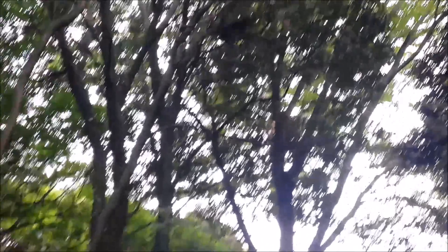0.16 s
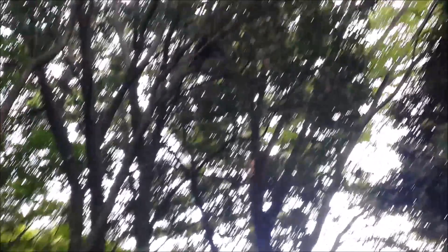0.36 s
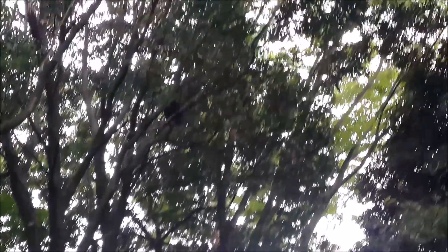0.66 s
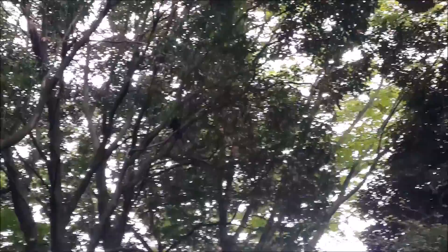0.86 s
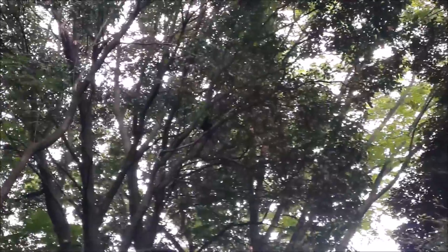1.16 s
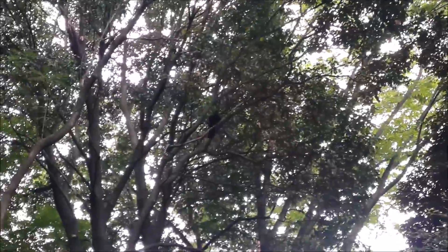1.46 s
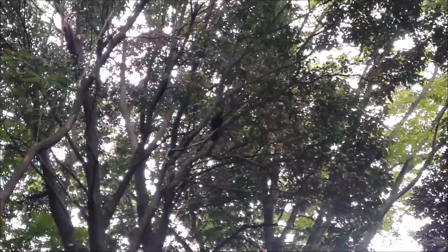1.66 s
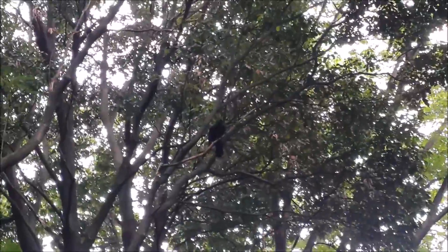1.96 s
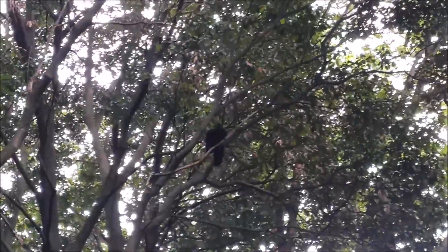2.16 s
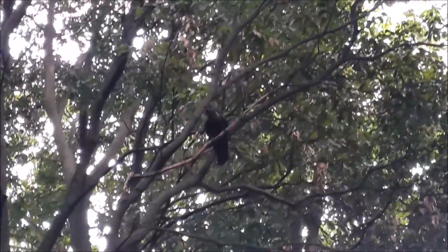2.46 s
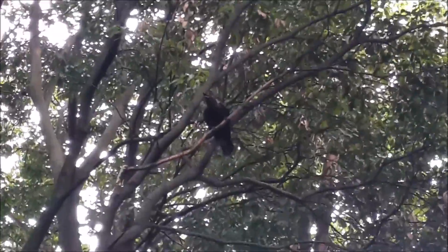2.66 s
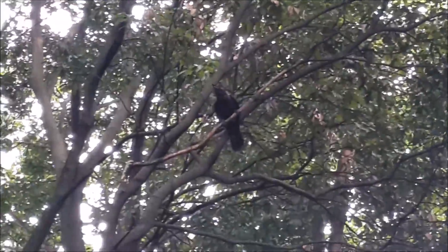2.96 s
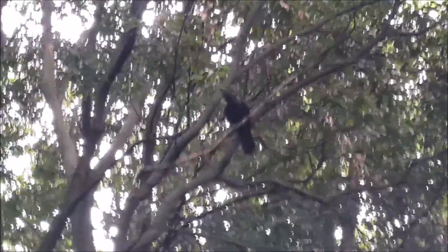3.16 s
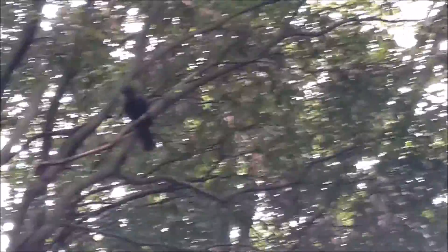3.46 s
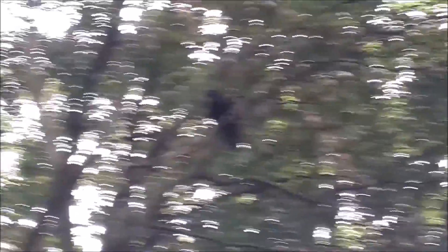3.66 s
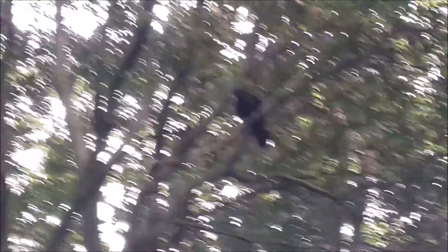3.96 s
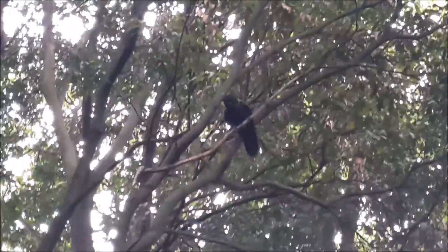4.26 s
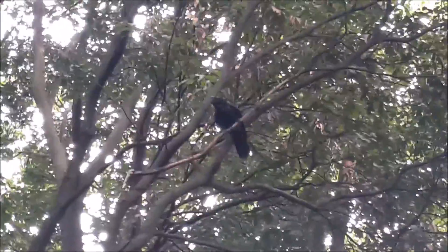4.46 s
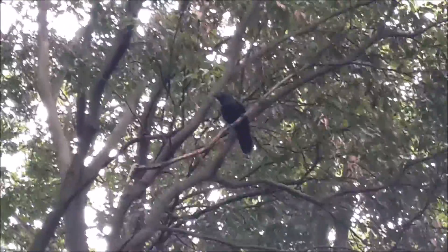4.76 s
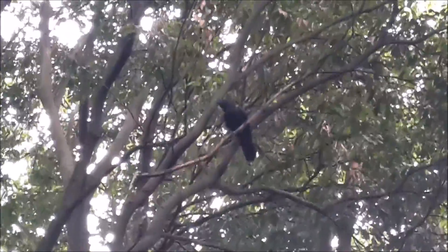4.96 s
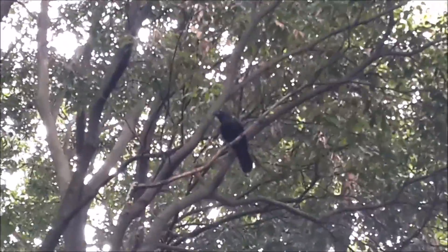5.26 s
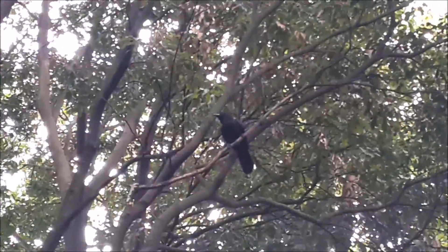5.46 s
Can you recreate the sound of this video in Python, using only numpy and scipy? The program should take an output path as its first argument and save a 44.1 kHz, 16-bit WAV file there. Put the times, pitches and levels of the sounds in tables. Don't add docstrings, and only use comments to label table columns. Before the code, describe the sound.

Quiet town rumble and airy leaf hiss quickly fade in within the first second, with a faint hoarse caw at 0-0.4 s. A crow some ten metres off then caws loudly at about 0.55, 1.45 and 2.1 s, each about a third of a second, nasal and raspy, rising quickly then sagging in pitch, with diffuse echoes from the trunks. A new caw starting at 2.7 s is cut off by a dropout; sound returns at 2.82 s with a short low thump and a fading echo. Around 3.25-3.3 s a finger slip makes a sharp, loud cluster of clicks on the left only. Caws resume at 3.5 s and, longer, 4.2-4.6 s. Thin, slightly falling whistles near 8 kHz come from the left at 0.4, 2.4, 2.75, 4.1 and 5 s. A distant lorry swells near 2.2 s, an engine drone near 4.2 s, and leaves rustle faintly around 4-4.7 s. A barely audible far crow begins at 5.5 s.

```python
import sys
import numpy as np
from scipy import signal
from scipy.fft import rfft, irfft
from scipy.io import wavfile
from scipy.ndimage import uniform_filter1d

SR = 44100
rng = np.random.default_rng(int(sys.argv[2]) if len(sys.argv) > 2 else 0)


def how_loud(loudness_db):
    steps = np.asarray(loudness_db, float) / 20
    return 10 ** steps


def unload_audio(sound):
    columns = np.transpose(np.atleast_2d(sound))
    steps = np.round(np.clip(columns, -1, 1) * 32767)
    wavfile.write(sys.argv[1], SR, steps.astype(np.int16))


N = 247356

# start_s, level_db
BACKGROUND_LEVEL = [(0, -38), (.45, -47), (.95, -51.5), (1.35, -56), (1.9, -51.5), (2.6, -52), (2.82, -57),
                    (3.2, -53.5), (4.1, -53.5), (4.7, -52.5), (5.1, -56), (5.61, -56)]
# pitch_hz, density_db (per Hz)
AIR_SPECTRUM = [(25, -35), (64, -6), (285, -7), (1100, -13), (1900, -17.5), (7710, -20), (8360, -30),
                (16000, -27)]
# pitch_hz, correlation (0-1)
PORT_LIKENESS = [(60, 0.8), (130, 0.95), (290, 0.76), (640, 0.52), (1410, 0), (3100, -0.13), (6820, 0.1),
                 (15000, 0)]
# centre_s, spread_s, level_db
RUSTLES = [
    (1.002, 0.15, -65.5),
    (4.0, 0.13, -59),
    (4.739, 0.068, -57.5),
]
# start_s, length_s, pitch_hz (at the start), fall_hz, level_db
WHISTLES = [
    (.39, .18, 8500, 190, -65.5),
    (2.43, .215, 8790, 235, -63),
    (2.75, 1.15, 8345, 150, -65.5),
    (4.085, .585, 8170, 180, -65),
    (5.0, .61, 8380, 217, -67.5),
]
# start_s, ring_db (peak), ring_hz, knock_db, crack_db
FINGER_SLIPS = [(3.2465, -34, 1480, -40, -60), (3.2595, -30, 6500, -36, -37), (3.262, -36, 2600, -36, -40),
                (3.266, -28, 7700, -31, -28), (3.2692, -27, 6500, -46, -30), (3.2747, -29, 5456, -50, -60),
                (3.28, -11, 4940, -14, -45), (3.283, -30, 5500, -44, -40), (3.285, -6, 5900, -54, -14),
                (3.2945, -9, 5600, -54, -19), (3.3059, -9.5, 5900, -53, -28)]
# lost_s, return_s
DROPOUT = (2.7385, 2.8174)
# centre_hz, width_hz, level_db
WINDPIPE = [
    (1200, 330, -4.5),
    (1730, 315, -19.5),
    (2233, 420, -24.5),
]
# centre_hz, width_hz, partials_db, turbulence_db
UPPER_RESONANCES = [(4250, 290, -12.5, -4.5), (4697, 1060, -8.5, -1.5), (6140, 5600, -33, -0.5),
                    (7570, 850, -19, -7.5), (10330, 1900, -15, -8.5)]
# start_s, pitch_hz, level_db, beak_hz (resonance)
FIRST_CAWS = [
    [(.545, 262.1, -43.5, 1130), (.589, 304.8, -31.5, 1330), (.649, 313.4, -23, 1310),
     (.707, 296.8, -24, 1350), (.791, 248.8, -28, 1210), (.819, 216.5, -33, 1200), (.845, 189.4, -36, 1260),
     (.87, 176, -48, 1290)],
    [(1.43, 220.5, -52, 1350), (1.466, 243.5, -31, 1345), (1.524, 302, -24, 1566),
     (1.57, 297.2, -22.5, 1480), (1.62, 285.3, -22.5, 1390), (1.64, 280, -26, 1495),
     (1.712, 251.3, -26, 1310), (1.758, 215.8, -31.5, 1300), (1.8, 185.5, -28, 1250)],
    [(2.07, 222, -75, 1200), (2.094, 231.9, -30.5, 1260), (2.13, 289.5, -25.5, 1485),
     (2.18, 308.7, -22.5, 1266), (2.28, 289.3, -23.5, 1440), (2.324, 265, -26, 1360),
     (2.39, 208.8, -32, 1250), (2.43, 201.8, -67, 1270)],
]
# start_s, pitch_hz, level_db, beak_hz
LATER_CAWS = [
    [(3.49, 217.2, -49, 1140), (3.522, 236.2, -32, 1296), (3.59, 293.7, -23, 1480),
     (3.642, 295.6, -23.5, 1440), (3.702, 279.6, -24, 1310), (3.788, 253.6, -27, 1310),
     (3.832, 235.6, -29.5, 1463), (3.868, 199.8, -30, 1257), (3.91, 187.2, -48, 1190)],
    [(4.18, 183.8, -62, 1275), (4.2, 206.6, -42.5, 1300), (4.234, 261.3, -25.5, 1353),
     (4.258, 285, -26, 1420), (4.296, 299.9, -23, 1460), (4.404, 284.7, -22.5, 1405),
     (4.458, 261, -24.5, 1314), (4.556, 204, -34.5, 1278), (4.6, 185, -34.5, 1260)],
]
# start_s, pitch_hz, level_db, beak_hz
HOARSE_CAW = [(.02, 279, -61, 1130), (0.039, 288, -48.5, 1100), (.08, 286.3, -42, 1110),
              (0.207, 305.3, -39, 1280), (.274, 254.2, -42.5, 1222), (.31, 253, -41.5, 1200),
              (.34, 238, -42.5, 1170), (0.368, 237, -60, 1200)]
# start_s, pitch_hz, level_db, beak_hz
LOST_CAW = [
    (2.71, 218, -39.5, 1160),
    (2.729, 227.4, -41, 1120),
    (2.74, 250, -33.5, 1200),
    (2.78, 254, -47, 1200),
]
# start_s, pitch_hz, level_db, beak_hz
FAR_CAW = [
    (5.461, 299, -74, 1250),
    (5.51, 312, -62, 1240),
    (5.57, 280, -60, 1200),
]
# opening_db (beak at full cry), facing_db (head turned this way),
# pan_db (left minus right), roughness (0-1), rasp_hz (lowest upper resonance)
MANNER = [
    (5, 0.5, 4.5, 0.09, 3140),
    (14, 0.5, 0.9, 0.1, 3270),
    (6.5, 3, -0.5, 0.08, 3410),
    (7.5, 0.2, -0.5, .06, 3460),
    (-1, -0.2, 0, .06, 3430),
    (4.5, 1.5, 3, 0.34, 2950),
    (-15, 9.5, -0.5, 0.14, 3230),
    (-6, -10, -5, 0.26, 3400),
]


def curve(table, s):
    table = np.array(table, float)
    return [np.interp(s, table[:, 0], column) for column in table[:, 1:].T]


def unit(x):
    return x / np.sqrt(np.mean(x ** 2))


def walk(rate, count):
    hold = int(SR / rate)
    steps = np.repeat(rng.standard_normal(count // hold + 1), hold)
    return unit(uniform_filter1d(uniform_filter1d(steps, hold), hold)[:count])


def resonance(hz, centre_hz, width_hz):
    return 1 / (1 + 1j * (hz - centre_hz ** 2 / hz) / width_hz)


def shape(x, response):
    hz = np.arange(1, x.shape[-1] // 2 + 2) * SR / x.shape[-1]
    return irfft(rfft(x) * response(hz), x.shape[-1])


def band(x, centre_hz, width_hz):
    return shape(x, lambda hz: resonance(hz, centre_hz, width_hz) ** 2)


def gate(count, rise_s, fall_s):
    s = np.arange(count) / SR
    return np.clip(s / rise_s, 0, 1) * np.clip((s[-1] - s) / fall_s, 0, 1)


def add(out, x, at_s):
    i = int(at_s * SR)
    out[..., i:i + x.shape[-1]] += x[..., :N - i]


def fade(s):
    return how_loud(np.minimum(-28.5 + 37.5 * s, 2.5))


def background():
    level_db, = curve(BACKGROUND_LEVEL, np.arange(N) / SR)
    log = lambda table: [(np.log(f), v) for f, v in table]
    rumble, hiss = 0, 0
    swell = walk(1.0, N)
    for hz in 25 * 2 ** np.arange(0, 9.4, 1 / 3):
        alike = np.clip(curve(log(PORT_LIKENESS), np.log(hz))[0], 0, 1)
        mid, side = band(rng.standard_normal((2, N)), hz, hz * 0.29)
        flicker_db = (2.2 if hz < 500 else .8) * walk(6, N)
        db = curve(log(AIR_SPECTRUM), np.log(hz))[0] + .6 * swell + flicker_db
        pair = np.sqrt(1 + alike) * mid + np.sqrt(1 - alike) * side * np.array([[1], [-1]])
        if hz > 500:
            hiss = hiss + how_loud(db) * pair
        else:
            rumble = rumble + how_loud(db) * pair
    return how_loud(level_db) * (how_loud(-3) * unit(rumble) + unit(hiss)) * how_loud(np.array([[.7], [-.7]]))


def engine_drone():
    nearest_s, passing_s = 4.2, 0.83
    distance = np.hypot(1, (np.arange(N) / SR - nearest_s) / passing_s)
    return how_loud(-59.5) / distance * unit(band(rng.standard_normal(N), 143.0, 7.4))


def lorry():
    passing_s, spread_s = 2.2, 0.49
    swell = np.exp(-((np.arange(N) / SR - passing_s) / spread_s) ** 2)
    return how_loud(-57.5) * swell * unit(band(rng.standard_normal(N), 110, 64))


def leaf_rustles():
    s = np.arange(N) / SR
    stirred = sum(how_loud(db) * np.exp(-((s - at_s) / spread_s) ** 2) for at_s, spread_s, db in RUSTLES)
    return stirred * unit(band(rng.standard_normal((2, N)), 5900, 1200))


def whistler():
    out = np.zeros((2, N))
    for at_s, length_s, top_hz, fall_hz, db in WHISTLES:
        s = np.arange(0, length_s, 1 / SR)
        hz = top_hz - fall_hz * np.log(1 + s / .013) - 150 * s
        db = db - 6 * np.clip(1 - s / .035, 0, 1) - 4 * s
        phase = 2 * np.pi * np.cumsum(hz * (1 + 0.00059 * walk(58.7, len(s)))) / SR
        for side, side_db in enumerate((4, -9)):
            level = np.sqrt(2) * how_loud(db + side_db + 1.2 * walk(27.0, len(s)))
            add(out[side], level * np.sin(phase + side) * gate(len(s), .008, 0.0087), at_s)
    return out


def finger():
    out = np.zeros((2, N))
    s = np.arange(600) / SR
    swing = lambda hz, tau_s: np.sin(2 * np.pi * hz * s) * np.e * s / tau_s * np.exp(-s / tau_s)
    for at_s, db, hz, knock_db, crack_db in FINGER_SLIPS:
        rattle = .3 * band(rng.standard_normal(600) * np.exp(-s / 0.00069), hz, 5200)
        ring = how_loud(db) * (swing(hz, 0.00009) + rattle)
        knock = how_loud(knock_db) * swing(1970, 0.00014)
        crack = how_loud(crack_db) * swing(9800, .00007)
        add(out, (ring + knock + crack) * how_loud(np.array([[0], [-34]])), at_s)
    return out


def trunks(x):
    s = np.arange(int(1.6 * SR)) / SR
    noise = rng.standard_normal((3, 2, len(s)))
    decay = lambda rise_s, t60_s: how_loud(-60 * s / t60_s) * np.clip(s / rise_s, 0, 1)
    near = how_loud(-42) * band(noise[0] + .8 * noise[0].sum(axis=0), 1300, 3000) * decay(.012, .28)
    far = how_loud(-49.0) * band(noise[1], 1480, 1500) * decay(.04, 1.155)
    bright = how_loud(-43) * band(noise[2], 5000, 6000) * decay(.05, .9)
    echoes = (near + far + bright) * how_loud(np.array([[1.], [-1.]]))
    return signal.fftconvolve(x[1:], echoes, axes=1)[:, :N]


def fading_echo():
    s = np.arange(N) / SR - DROPOUT[1]
    ring = band(rng.standard_normal((2, N)), 1232, 160) + how_loud(-3) * band(rng.standard_normal((2, N)), 1430, 230)
    return unit(ring) * how_loud(-48.5 - 60 * s / 1.5) * (s > 0)


def side_pocket(hz, rasp_hz):
    return 1 - .45 * abs(resonance(hz, rasp_hz - 640, 380)) ** 2


def vocal_tract(partial_hz, beak_hz, open_db, modes):
    low, middle, high = (how_loud(d) * resonance(partial_hz, f, w) ** 2 for f, w, d in WINDPIPE)
    throat = resonance(partial_hz, beak_hz, 210) ** 2 + low + how_loud(open_db) * (high - middle)
    throat = throat * resonance(partial_hz, 690, 990) / (1 + (930 / partial_hz) ** 6)
    upper = np.sqrt(sum(abs(how_loud(d) * resonance(partial_hz, f, w) ** 2) ** 2 for f, w, d, _ in modes))
    return [v / np.sqrt(np.sum(abs(v) ** 2, axis=0) / 2) for v in (throat, upper)]


def chest(phase, hz, db, sunk, side):
    first_db = db - 23 - 19.5 * np.clip(1 - sunk / 0.11, 0, 1)
    second_db = db - 21 - 13 * np.exp(-((2 * hz - 511.5) / 31) ** 2)
    return np.sqrt(2) * (how_loud(first_db) * np.sin(phase) + how_loud(second_db) * np.sin(2 * phase + 0.098 * side))


def caw(table, open_db, facing_db, pan_db, rough, rasp_hz):
    s = np.arange(table[0][0], table[-1][0], 1 / SR)
    count = len(s)
    hz, db, beak_hz = curve(table, s)
    hz = uniform_filter1d(hz, int(.025 * SR), mode="nearest")
    open_db = open_db + 2.5 * (db - db.max())
    sunk = 1 - hz / np.maximum.accumulate(hz)
    late_start_db = -12 * np.clip(1 - (s - s[0]) / 0.091, 0, 1)
    rasp_db = -17 + facing_db - 8.5 * sunk + late_start_db
    rough = np.clip(rough + .9 * sunk, 0, 1)
    jitter = .001 * walk(40, count) + .022 * rough * walk(250, count)
    phase = 2 * np.pi * np.cumsum(hz * (1 + jitter)) / SR

    modes = [(rasp_hz, 650, -3, -2)] + UPPER_RESONANCES
    k = np.arange(3, 28)[:, None]
    throat, upper = vocal_tract(k * hz, beak_hz, open_db, modes)
    airy = np.clip(.05 + 1.7 * rough, 0, .9)
    rasp = how_loud(rasp_db - 4.5) * np.sqrt(1 - airy) * upper
    puff = (.5 + .5 * np.cos(phase - 1)) ** 0.34
    size = how_loud(7.6 * rough * walk(198.2, count))
    gust = how_loud(0.91 * walk(23.7, count))
    patchy = np.array([how_loud(2.04 * walk(16.7, count)) for _ in k]) * side_pocket(k * hz, rasp_hz)
    pocket = lambda x: shape(x, lambda f: side_pocket(f, rasp_hz))
    out = []
    for side, lag_s in ((1, .0001), (-1, 0)):
        late = np.exp(-2j * np.pi * k * hz * lag_s)
        pulses = (throat * late + rasp) * np.exp(1j * k * phase)
        flutter = np.array([how_loud(1.4 * walk(14, count)) * np.exp(.4j * walk(12, count)) for _ in k])
        voice = size * np.sum(np.imag(pulses * flutter * patchy), axis=0)
        hoarse = pocket(unit(band(puff * rng.standard_normal(count), 1326, 880)))
        jets = [how_loud(d) * unit(band(puff * rng.standard_normal(count), f, w)) for f, w, _, d in modes]
        top_air = how_loud(-10.0 + 0.43 * facing_db) * pocket(sum(jets[3:]))
        air = np.sqrt(airy) * pocket(unit(sum(jets[:3]))) + top_air
        body = how_loud(db + side * pan_db / 2) * (voice + 1.64 * rough * hoarse)
        body = body + how_loud(db + rasp_db + 2.0) * gust * air
        out.append((body + chest(phase, hz, db, sunk, side)) * gate(count, 0.019, 0.049))
    return np.array(out)


def scene():
    crow = np.zeros((2, N))
    for table, manner in zip(FIRST_CAWS + LATER_CAWS + [HOARSE_CAW, LOST_CAW, FAR_CAW], MANNER):
        add(crow, caw(table, *manner), table[0][0])
    crow = crow / fade(np.arange(N) / SR)
    surroundings = background() + engine_drone() + lorry() + leaf_rustles()
    return surroundings + whistler() + finger() + trunks(crow) + fading_echo() + how_loud(0.5) * crow


def roll_off(x):
    return signal.sosfilt(signal.butter(12, 16480, fs=SR, output="sos"), x)


def record(dry):
    s = np.arange(N) / SR
    lost_s, return_s = DROPOUT
    after = np.clip(s - return_s, 0, None)
    swing = np.cos(2 * np.pi * 95 * after + 0.42) / np.cos(.6)
    thump = 0.11 * (1 - np.exp(-after / .00007)) * np.exp(-after / 0.0021) * swing
    lost = (s > lost_s) & (s < return_s)
    live = np.where(lost, how_loud(-32 - 2600 * (s - lost_s)), 1)
    heard = dry * fade(s) * live + thump
    treble_cut = signal.ellip(8, .2, 60, 15650, fs=SR, output="sos")
    return roll_off(signal.sosfilt(treble_cut, heard))


dry = scene()
out = record(dry)
unload_audio(out)
```